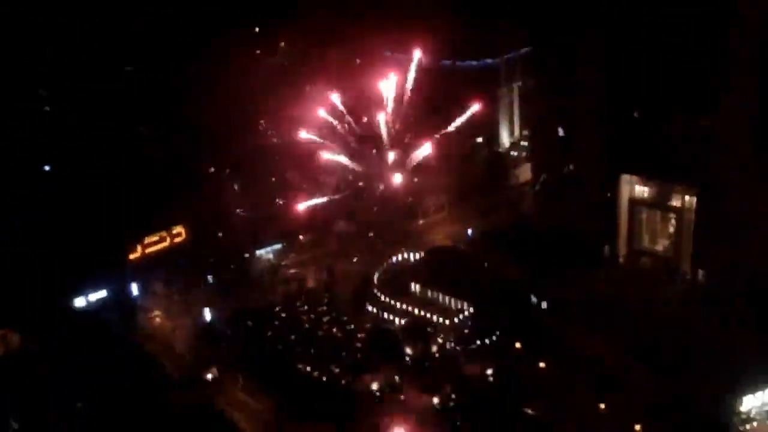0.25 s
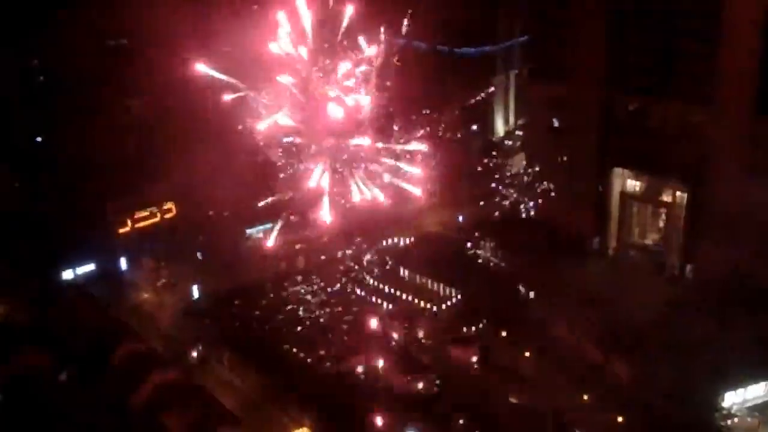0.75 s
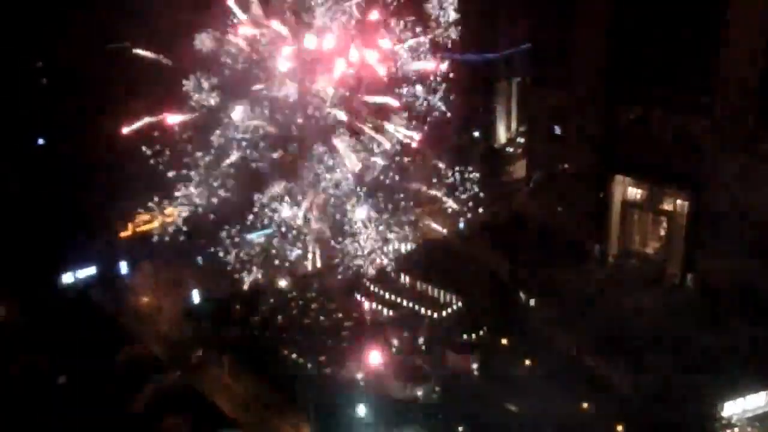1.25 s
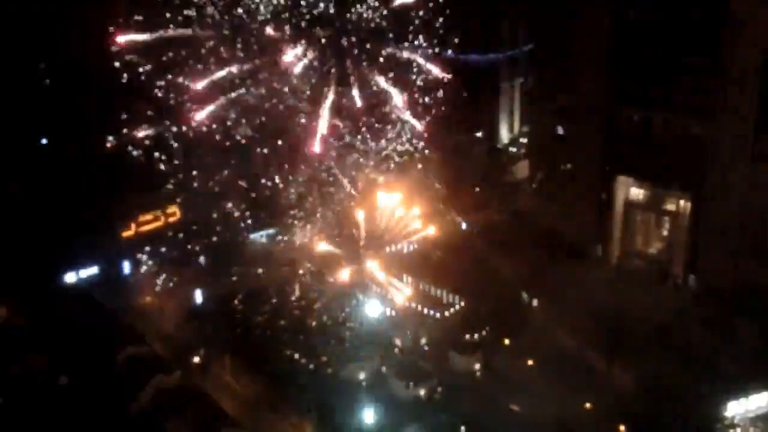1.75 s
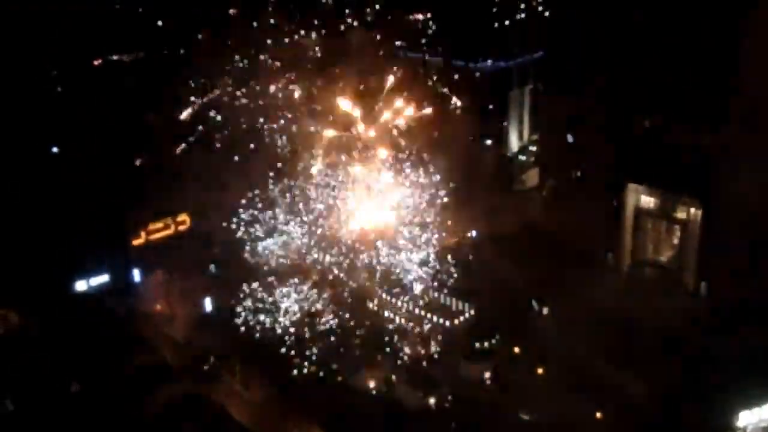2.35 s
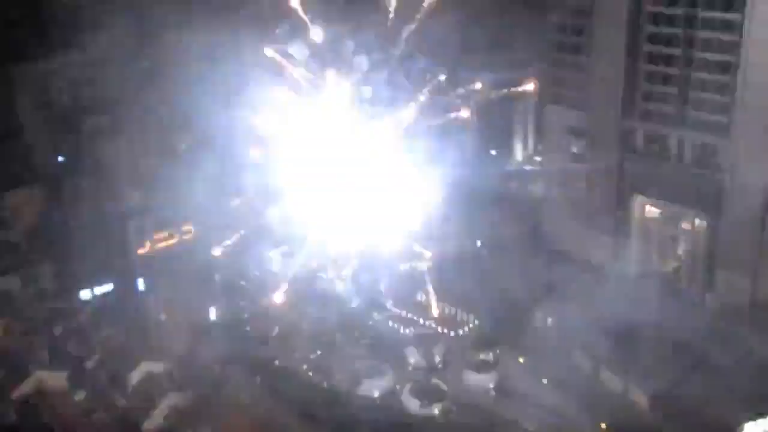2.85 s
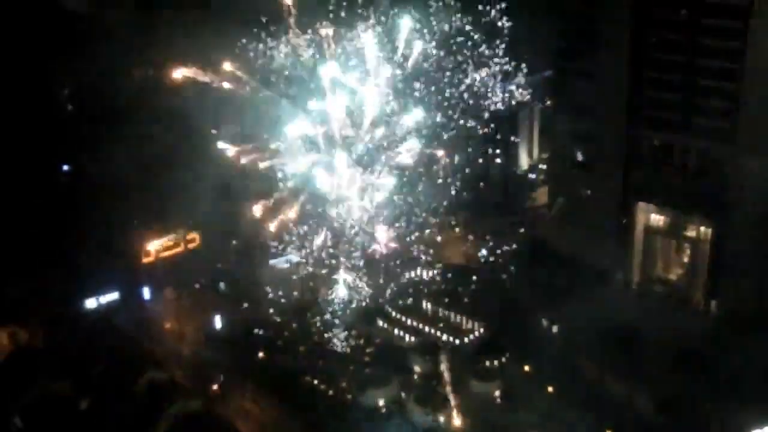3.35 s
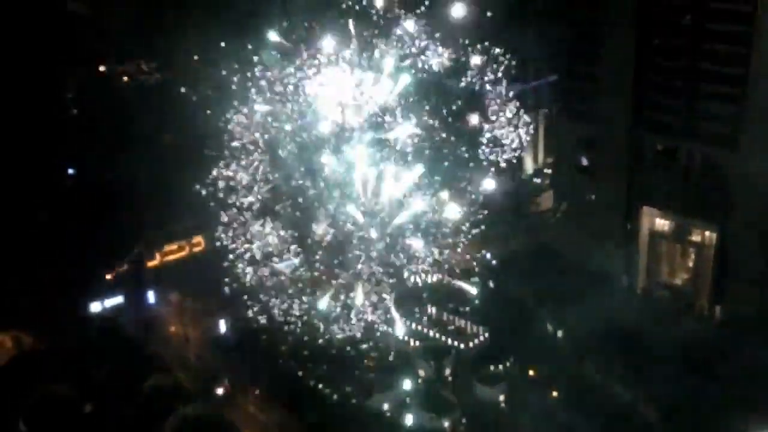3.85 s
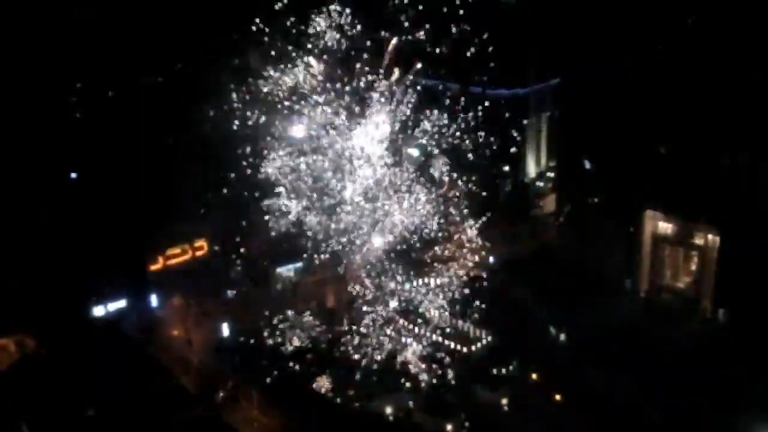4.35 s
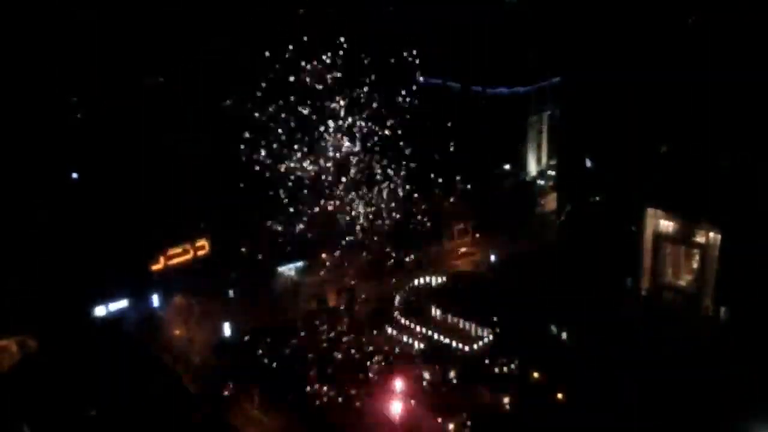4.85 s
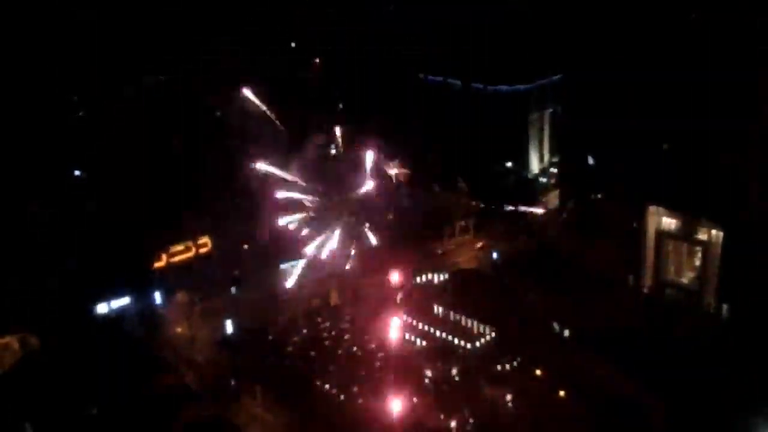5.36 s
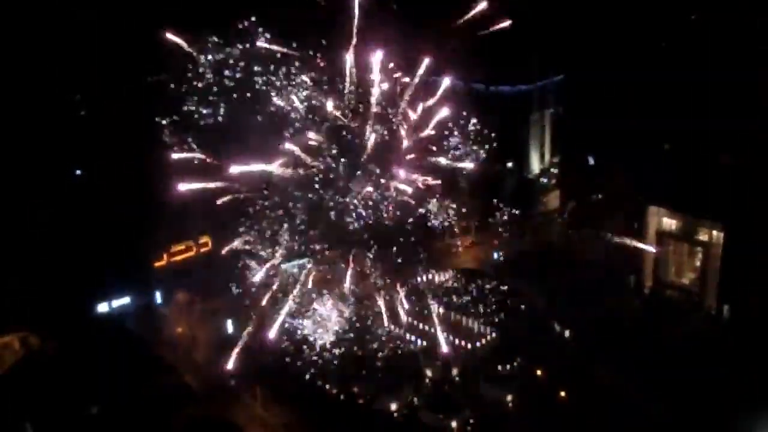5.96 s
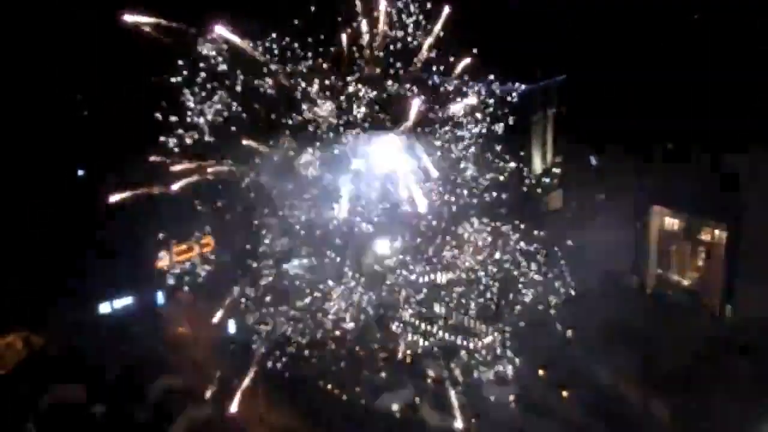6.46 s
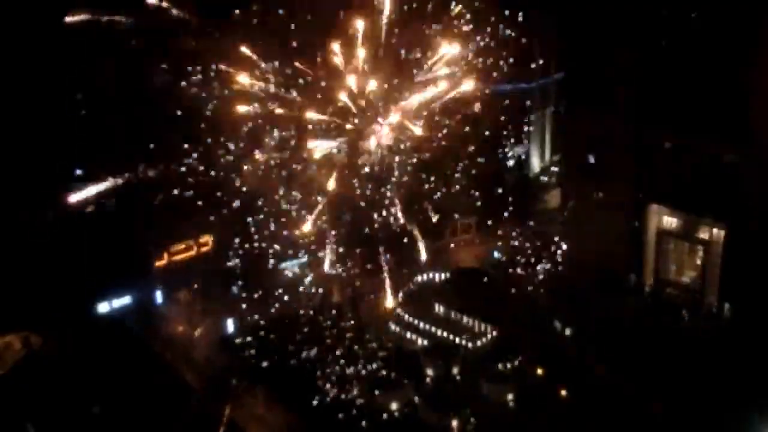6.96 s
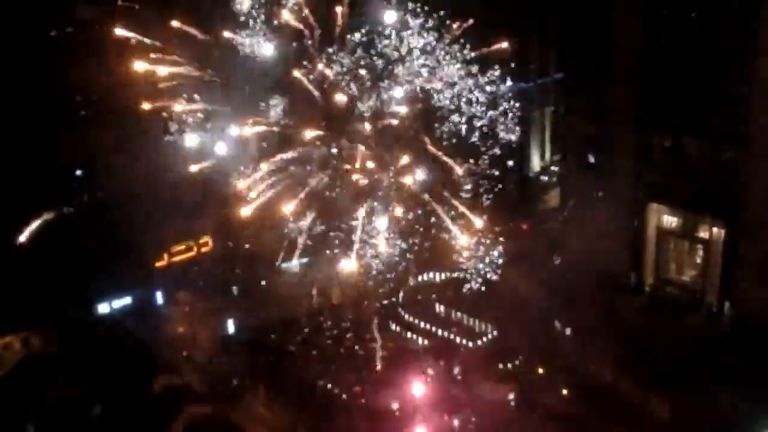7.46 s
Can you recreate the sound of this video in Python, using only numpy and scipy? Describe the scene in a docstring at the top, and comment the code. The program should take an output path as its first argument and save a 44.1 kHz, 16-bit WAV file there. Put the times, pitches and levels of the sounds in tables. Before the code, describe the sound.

Loud firework bangs and nonstop crackle across a city, with a rolling rumble underneath, heard from a room high above the street.

```python
"""A rolling din of fireworks, and almost at once the boom of a near shell, fill a room high above a street.
The night city's far reports, firecrackers and crackling stars superpose into that continuous din.
Launch tubes knock as their modes ring. Each near blast enters by the window as a pressure pulse,
slaps between the walls and excites the room's standing waves; the house fronts send it back.
The recorder turns its gain down after loud bangs."""
import sys
import numpy as np
from scipy import signal
from scipy.fft import rfft, irfft, next_fast_len
from scipy.io import wavfile
from scipy.ndimage import uniform_filter1d, minimum_filter1d

SR = 44100
rng = np.random.default_rng(int(sys.argv[2]) if len(sys.argv) > 2 else 0)


def inscribe(sig):
    """Save sig as 16-bit PCM at rate SR to the path in sys.argv[1].

    A 1-D sig is mono; a 2-D sig holds one channel per row.
    Samples are clipped to [-1, 1] before scaling.
    """
    pcm = np.round(np.clip(np.atleast_2d(sig).T, -1, 1) * 32767)
    wavfile.write(sys.argv[1], SR, pcm.astype(np.int16))


N = 339570
T = np.arange(SR // 2) / SR  # time axis of one bang, in seconds

# The far barrage of heavy shells. Each row: time in seconds, rumble level in dB, thud level in dB.
FAR_BARRAGE = [(0, -42, -31), (.5, -42, -33), (.8, -35, -26.5), (1.05, -34, -28), (1.28, -35.5, -29),
               (1.6, -45, -35), (1.85, -37, -34.5), (2.35, -41.5, -34.5), (2.9, -38, -32.5),
               (3.22, -37, -27.5), (3.6, -51, -31), (4.0, -38, -29), (4.4, -39.5, -33.5),
               (5.15, -42, -32.5), (5.5, -43, -29), (6.25, -43, -28.5), (6.65, -47, -33.5),
               (7.3, -34, -26.5)]
# Far strings of firecrackers. Each row: time in seconds, pop level in dB, crackle level in dB.
FAR_STRINGS = [(0, -32, -41.5), (.5, -32, -42.5), (1.25, -30, -41.5), (1.5, -34.5, -41.5),
               (2.0, -33.5, -41), (2.4, -35, -44), (2.68, -33.5, -40), (2.92, -35.5, -46), (3.25, -32, -41),
               (3.62, -34.5, -43.5), (3.95, -31.5, -40), (4.55, -34, -41.5), (4.85, -33, -41.5),
               (5.5, -33, -43.5), (6.0, -33.5, -43), (6.6, -37, -44), (7.3, -30.5, -40.5), (7.7, -30, -41)]
# Spectra of the din's five layers. Each row: frequency in Hz, relative spectral density in dB.
RUMBLE = [(20, -40), (31, -22), (41, 2.5), (52, -2), (65, -8), (86, 3.5), (110, -5.5), (160, -46)]
THUDS = [(70, -24), (115, -1), (165, 0.5), (200, -1), (250, -1.5), (320, -6), (430, -7), (650, -38.5)]
POPS = [(280, -42), (460, 0.5), (650, 0.5), (840, -1), (980, -3), (1150, -0.5), (1300, -6.5), (1550, -10),
        (2200, -70)]
CRACKLE = [(1000, -24), (1600, -1), (2100, 4.5), (2650, -4.5), (3050, -8.5), (4000, -18), (5000, -29),
           (7000, -39.5), (12000, -45.5)]
FIZZ = [(3000, -27), (5500, -14), (7500, 4), (10000, 4.5), (15500, 3)]
# Clouds of glitter stars. Each row: peak time in seconds, level in dB, Gaussian width in seconds.
GLITTER_CLOUDS = [(.4, -72.5, 0.061), (1.24, -71, 0.047), (1.675, -71, .1), (2.234, -66, 0.023),
                  (2.515, -63, 0.056), (3.886, -66, .06), (4.151, -69, 0.13), (4.533, -64, 0.03),
                  (4.637, -63, 0.04), (4.95, -72.5, .12), (6.206, -62, 0.034), (6.573, -65.5, 0.04),
                  (6.716, -65, 0.021), (7.392, -70, 0.051)]
# Their spectrum. Each row: frequency in Hz, relative spectral density in dB.
SPARKS = [(4000, 1), (5500, 4.5), (6400, 0), (7500, -3), (9500, -12), (13000, -17)]
# Clear firecrackers and stars. Each row: time in seconds, relative level in dB, centre frequency in Hz.
CRACKERS = [(0.2578, -27.5, 2010), (0.8384, -28, 2450), (1.1932, -31.5, 2550), (1.221, -24.5, 1920),
            (1.286, -27.5, 2010), (1.3477, -31.5, 2113), (1.3737, -22.5, 1966), (1.5368, -28, 2130),
            (4.7267, -32.5, 2370), (4.8871, -26, 2090), (5.019, -27, 2050), (5.149, -31, 1980),
            (5.8666, -30, 2250), (6.1993, -28, 2104), (7.2203, -27.5, 2087), (7.408, -28.5, 2110)]
STARS = [(1.054, -54, 4290), (1.915, -46.5, 4300), (2.235, -50, 4090), (3.887, -47, 4246),
         (4.732, -44.5, 4070), (4.886, -46, 3850), (5.814, -45, 3414), (7.53, -47, 4210)]
# Fainter, random ones. Each holds: number per second, typical relative level in dB, centre in Hz.
STRAY_CRACKERS = (2.5, -36.5, 2330)
STRAY_STARS = (5, -58, 4610)
# Clear distant reports. Each row: time in seconds, relative levels of thump, clap and ring in dB.
REPORTS = [(0.3, -46, -28.5, -32), (0.785, -24, -37, -34), (0.867, -27, -33.5, -41), (1.155, -35, -30, -38),
           (1.542, -23, -34, -29), (1.949, -30, -39, -33), (2.24, -28.5, -27.5, -38), (2.64, -23, -43, -38),
           (2.722, -20.5, -34.5, -37), (3.159, -29, -31.5, -48), (3.543, -31, -32.5, -27),
           (3.875, -36, -29.5, -39), (4.164, -33, -34, -34), (4.324, -43, -34, -27), (4.732, -38, -42, -27),
           (4.884, -41, -38, -30), (5.403, -42, -39, -30), (5.504, -20, -36, -50), (5.815, -35, -30, -26),
           (5.869, -23, -35, -33), (6.265, -23.5, -37, -31), (6.329, -29, -42, -32), (6.588, -34, -33, -34),
           (7.215, -21, -35, -26), (7.49, -22, -41, -31), (7.53, -38, -37, -25)]
# Fainter, random ones: number per second, typical relative levels of thump, clap and ring in dB.
STRAY_REPORTS = (4, -33, -40, -42)
# Spectra of a report's clap and ring. Each row: frequency in Hz, relative spectral density in dB.
REPORT_CLAP = [(330, -41), (480, -2), (850, -4), (1200, -10.5)]
REPORT_RING = [(800, -11), (1100, 9.5), (1450, -0.5), (2100, -33)]
# Knocks of launch tubes. Each row: start in seconds, relative level in dB.
LAUNCHES = [(0.5687, -12.5), (6.211, -20), (6.272, -25), (6.6507, -20.5)]
# Modes of a tube and of the room. Each row: frequency in Hz, relative level in dB, T60 in seconds.
TUBE_MODES = [(800, 3.5, 0.031), (1200, 4, 0.02), (1398, 2.5, 0.033), (2520, -19, .02), (4030, -29, 0.025)]
ROOM_MODES = [(41, -31.5, 0.76), (82, -34, 0.9), (205, -44, 0.37)]
# Near shells. Each row: start in seconds, relative levels of boom, clap, crack and sizzle in dB.
SHELLS = [(0.0778, -19.5, -24.5, -37.5, -56.5), (0.676, -17, -25, -34.5, -50),
          (0.7265, -20.5, -27, -32, -54.5), (0.8993, -21.5, -26, -33.5, -58),
          (1.022, -28.5, -28.5, -35, -62), (1.4, -18.5, -27.5, -35.5, -55),
          (1.764, -23, -26.5, -36.5, -51.5), (2.5286, -16, -23, -29.5, -47.5),
          (2.746, -18.5, -25, -32, -52), (2.949, -23.5, -30.5, -39.5, -56.4),
          (3.0297, -21.5, -27, -38, -54), (3.2409, -25, -22.5, -41, -54.0),
          (3.3366, -20, -25.5, -34, -52.7), (3.6853, -25.5, -27.5, -41.5, -55),
          (3.8273, -22.5, -27.5, -37, -57), (5.3102, -14, -23, -33.5, -45.5),
          (5.7031, -16, -23.5, -33, -47.5), (5.7548, -18, -24, -35, -51), (6.056, -21, -29.5, -38, -58),
          (6.14, -20, -27, -35, -52), (6.8457, -23, -28, -36.5, -55), (7.0247, -21, -26.5, -32.5, -52.5),
          (7.0895, -21, -27, -35.5, -57), (7.2978, -19.5, -25, -35.5, -53), (7.689, -19.5, -27, -34, -48.5)]
# Spectra of a blast coming through the window and of its three scattered parts.
# Each row: frequency in Hz, relative spectral density in dB.
BLAST = [(25, -57), (45, -3.5), (85, 3), (150, 6.5), (225, 4), (300, -5.5), (450, -12.5), (800, -13),
         (1200, -22.5), (1600, -51), (4000, -64), (9000, -65)]
CLAP = [(250, -29), (450, -1.5), (650, -6), (830, 0.5), (1000, -9), (1170, -4), (1450, -14), (2200, -21.5)]
CRACK = [(900, -22), (1500, -9), (2100, 4), (2600, 6.5), (3100, -2.5), (4000, -12.5), (5500, -29),
         (9000, -48)]
SIZZLE = [(2500, -6), (4800, 2.5), (7000, 1), (10000, -2.5), (12500, -1), (15500, -9)]
# Direct sound and first reflections off walls, floor and ceiling; the open window inverts one.
# Each row: delay in seconds, pressure gain.
ROOM_PATHS = [(0, 0.45), (.005, 0.18), (.0098, 0.81), (0.0115, -0.79), (0.0125, 0.75), (0.0178, 0.069),
              (.0232, 0.29), (.031, .18), (0.0547, 0.035)]
# Resonances of window and room. Each row: centre in Hz, bandwidth in Hz, gain in dB.
RESONANCES = [(193.5, 8.2, 6.5), (367.5, 22, 3), (842, 32, 3), (2120, 11, -1), (2556, 33, 8),
              (2660, 32, 5.5), (5330, 74, 6), (6200, 70, 8), (7700, 250, 3)]
# Stereo width. Each row: frequency in Hz, gain of side against mid in dB.
WIDTH = [(100, -34), (500, -27), (1000, -21), (2000, -14), (4000, -8.5), (8000, -8), (15000, -8)]
# Stereo balance. Each row: frequency in Hz, gain of left against right in dB.
BALANCE = [(200, 1.87), (600, 1.1), (2000, 1.8), (4000, 2.5), (8000, 3.5), (12000, 0)]

STRAY_SPREAD_DB, STRAY_SPREAD_OCTAVES = 2, 0.16  # standard deviations among the random bangs
ROLL_RISE_S, ROLL_T60_S = 0.11, 2  # the city's answer to a near shell swells and dies
ROLL_RUMBLE_DB, ROLL_THUDS_DB = -18, -13  # its two parts, against the shell's boom
FIZZ_UNDER_DB = -28  # against the crackle
DUCK_FROM_DB, DUCK_SHARE, DUCK_ATTACK_S, RECOVER_DB_PER_S = -19, 0.47, 0.05, 8
BASS_CUT_HZ, TOP_HZ = 34, 15830


def amp(db):
    """Amplitude ratio: a factor of ten for every 20 dB."""
    return 10 ** (np.asarray(db) / 20)


def unit(x):
    """Normalisation to rms 1."""
    return x / np.sqrt(np.mean(x ** 2) + 1e-20)


def unit_onset(x):
    """Normalisation of a bang to rms 1 over its first 25 ms."""
    return x / np.sqrt(np.mean(x[..., :SR // 40] ** 2))


def along(points, hz):
    """Interpolation of (Hz, value) points on a logarithmic frequency axis."""
    knots_hz, values = np.transpose(points)
    return np.interp(np.log(hz + 1), np.log(knots_hz + 1), values)


def curves(rows):
    """Linear interpolation in time: one value per sample for each column after the first."""
    times, *columns = np.transpose(rows)
    return [np.interp(np.arange(N) / SR, times, column) for column in columns]


def gain(points, hz):
    """Magnitude response of a spectrum, with a roll-off of 30 dB per octave beyond its ends."""
    octaves_below = np.maximum(np.log2(points[0][0] / (hz + 1)), 0)
    octaves_above = np.maximum(np.log2((hz + 1) / points[-1][0]), 0)
    return amp(along(points, hz) - 30 * (octaves_below + octaves_above))


def filtered(x, response):
    """Linear filtering: the spectrum of x is multiplied by a frequency response."""
    n = x.shape[-1]
    padded = next_fast_len(n + 8192)
    return irfft(rfft(x, padded) * response(np.fft.rfftfreq(padded, 1 / SR)), padded)[..., :n]


def coloured(x, points):
    """Zero-phase shaping of x by a tabulated spectrum."""
    return filtered(x, lambda hz: gain(points, hz))


def pulse(points, size=32768):
    """Minimum phase: folding the cepstrum gives a causal pressure pulse with this spectrum."""
    cepstrum = irfft(np.log(gain(points, np.fft.rfftfreq(size, 1 / SR)) + 1e-6))
    cepstrum[1:size // 2] *= 2
    cepstrum[size // 2 + 1:] = 0
    return irfft(np.exp(rfft(cepstrum)))[:len(T)]


def ringing(modes):
    """Free vibration: a sum of exponentially damped sinusoids."""
    return sum(amp(db - 60 * T / t60) * np.sin(2 * np.pi * hz * T) for hz, db, t60 in modes)


def noise():
    """Half a second of uncorrelated white noise for mid and side."""
    return rng.standard_normal((2, len(T)))


def burst(source, colour, rise, t60, tail_db, tail_t60=0.46, front=0):
    """Scattering in a room: after a bang's direct front, echoes build up and die, leaving a weak tail."""
    build = 1 - (1 - front) * np.exp(-(T / rise) ** 2)
    decay = amp(-60 * np.maximum(T - rise, 0) / t60) + amp(tail_db - 60 * T / tail_t60)
    return unit_onset(coloured(source, colour) * build * decay)


def add(track, s, x):
    """Superposition: x joins the track at s seconds."""
    start = int(np.clip(round(s * SR), 0, N - 1))
    track[:, start:start + len(T)] += x[:, :N - start]


def strays(rate, size):
    """Independent events: uniformly random times, each with `size` normal deviates."""
    moments, deviates = rng.uniform(0, N / SR, 64), rng.standard_normal((64, size))
    return [(s, *row) for s, row in zip(moments, deviates)][:int(rate * N / SR)]


def stray_charges(rate, db, hz):
    """Random charges, normally spread in level and log pitch, as rows of seconds, dB and Hz."""
    return [(s, db + STRAY_SPREAD_DB * loud, hz * 2 ** (STRAY_SPREAD_OCTAVES * high))
            for s, loud, high in strays(rate, size=2)]


def volley(colour, rate, spread_db, t60, wash_db, directions=6):
    """Shot noise: random far bangs, each convolved with its echoes, over their merged wash; rms 1."""
    bangs = np.zeros((2, N))
    for _ in range(directions):
        fired = rng.random(N) < rate / directions / SR
        sizes = amp(spread_db * np.clip(rng.standard_normal(N), -2, 1.5))
        echoes = noise() * amp(-60 * T / t60)
        bangs += signal.fftconvolve((fired * sizes)[None], echoes, axes=1)[:, :N]
    wash = amp(wash_db) * rng.standard_normal((2, N))
    return unit(coloured(unit(bangs) + wash, colour))


def city_roll():
    """Reverberation: the envelope of the city's echoes of the near shells, which add in energy."""
    t = np.arange(2 * SR) / SR
    answer = (1 - np.exp(-(t / ROLL_RISE_S) ** 2)) * amp(-60 * t / ROLL_T60_S)
    fired = np.zeros(N)
    for s, boom_db, *_ in SHELLS:
        fired[min(round(s * SR), N - 1)] = amp(boom_db)
    return np.sqrt(np.abs(signal.fftconvolve(fired ** 2, answer ** 2)[:N]))


def din():
    """Incoherent addition: far shells and echoes rumble and thud; small strings pop, crackle and fizz."""
    rumble_db, thuds_db = curves(FAR_BARRAGE)
    pops_db, crackle_db = curves(FAR_STRINGS)
    echoes = city_roll()
    rumble_gain = np.hypot(amp(rumble_db), amp(ROLL_RUMBLE_DB) * echoes)
    thuds_gain = np.hypot(amp(thuds_db), amp(ROLL_THUDS_DB) * echoes)
    fizz_gain = amp(crackle_db + FIZZ_UNDER_DB) * amp([[0], [-9]])  # weaker in the side channel
    out = rumble_gain * unit(coloured(rng.standard_normal((2, N)), RUMBLE))
    out += thuds_gain * volley(THUDS, rate=130, spread_db=3, t60=0.083, wash_db=0)
    out += amp(pops_db) * volley(POPS, rate=120, spread_db=4.5, t60=0.043, wash_db=4.5)
    out += amp(crackle_db) * volley(CRACKLE, rate=160, spread_db=7.5, t60=0.07, wash_db=5)
    return out + fizz_gain * volley(FIZZ, rate=270, spread_db=2, t60=0.018, wash_db=0)


def glitter():
    """Temporal fusion: stars going off almost together merge into short sizzling swells."""
    t = np.arange(N) / SR
    swell = sum(amp(db) * np.exp(-((t - s) / width) ** 2 / 2) for s, db, width in GLITTER_CLOUDS)
    return swell * volley(SPARKS, rate=170, spread_db=6, t60=0.022, wash_db=-10)


def crackers_and_stars():
    """Band-limited transients: firecrackers snap and stars tick, each pitched by its spectral peak."""
    out = np.zeros((2, N))
    for s, db, hz in CRACKERS + stray_charges(*STRAY_CRACKERS):
        colour = [(hz * 0.46, -18), (hz * 0.95, -4), (hz * 0.96, 0),
                  (hz * 1.09, -6), (hz * 1.72, -25), (hz * 3, -42)]
        snap = burst(noise(), colour, rise=0.002, t60=0.095, tail_db=-24, front=0.4)
        add(out, s - 0.001, amp(db - 10.5) * snap)
    for s, db, hz in STARS + stray_charges(*STRAY_STARS):
        colour = [(hz * 0.43, -10), (hz, 0), (hz * 1.26, -20)]
        tick = burst(noise(), colour, rise=0.0023, t60=0.063, tail_db=-22, front=0.44)
        add(out, s - 0.001, amp(db - 2.5) * tick)
    return out


def distant_reports():
    """Air absorption takes the treble from distant shells, leaving a thump, a clap and a ring."""
    out = np.zeros((2, N))
    rate, *typical_db = STRAY_REPORTS
    faint = [(s, *(np.array(typical_db) + STRAY_SPREAD_DB * np.array(deviates)))
             for s, *deviates in strays(rate, size=3)]
    for s, thump_db, clap_db, ring_db in REPORTS + faint:
        thump = burst(noise(), THUDS, rise=0.0047, t60=0.091, tail_db=-16)
        clap = burst(noise(), REPORT_CLAP, rise=0.0019, t60=0.17, tail_db=-24)
        ring = burst(noise(), REPORT_RING, rise=0.0053, t60=0.079, tail_db=-23)
        add(out, s, amp(thump_db - 3) * thump)
        add(out, s - 0.002, amp(clap_db) * clap + amp(ring_db - 8) * ring)
    return out


def launches():
    """Impulse excitation: a lifting charge ticks sharply and sets the modes of its tube ringing."""
    out = np.zeros((2, N))
    ring = ringing(TUBE_MODES) * (1 - np.exp(-(T / 0.0022) ** 2))
    for s, db in LAUNCHES:
        echo = burst(noise(), CLAP, rise=0.0064, t60=0.057, tail_db=-33)
        tick = burst(noise(), SIZZLE, rise=0.002, t60=0.04, tail_db=-26)
        add(out, s, amp(db) * (ring + amp(-17.5) * echo + amp(-52) * tick))
    return out


def near_shells():
    """Multipath propagation: all blasts take the same main paths in the room; the fine scatter varies."""
    out = np.zeros((2, N))
    slaps = lambda hz: sum(share * np.exp(-2j * np.pi * hz * delay) for delay, share in ROOM_PATHS)
    boom = unit_onset(filtered(pulse(BLAST), slaps)) + amp(17.5) * ringing(ROOM_MODES)
    common_scatter = noise()
    scatter = lambda: common_scatter / 2 + noise()
    for s, boom_db, clap_db, crack_db, sizzle_db in SHELLS:
        house_echoes = burst(noise(), THUDS, rise=0.029, t60=0.81, tail_db=-26)
        clap = burst(scatter(), CLAP, rise=0.0019, t60=0.092, tail_db=-32)
        back_wall_clap = burst(scatter(), CLAP, rise=0.002, t60=0.069, tail_db=-24)
        crack = burst(scatter(), CRACK, rise=0.0051, t60=0.08, tail_db=-29, front=0.27)
        # the harder the blast, the brighter its sizzle
        tilted = [(hz, db + 0.26 * (sizzle_db + 50) * np.log2(hz / 7000)) for hz, db in SIZZLE]
        sizzle = burst(scatter(), tilted, rise=0.002, t60=0.054, tail_db=-19, tail_t60=0.25, front=0.3)
        add(out, s, amp(boom_db) * (boom + amp(-30) * house_echoes))
        add(out, s, amp(clap_db - 3.5) * clap + amp(crack_db) * crack + amp(sizzle_db) * sizzle)
        add(out, s + 0.0098, amp(clap_db - 2.5) * back_wall_clap)
    return out


def scene():
    """Coherence: both microphones get like bass but unlike treble; the left is nearer the window."""
    resonance = lambda hz: amp(sum(db / (1 + (2 * (hz - centre) / width) ** 2)
                                   for centre, width, db in RESONANCES))
    near = near_shells() + launches()
    far = filtered(din() + glitter() + distant_reports() + crackers_and_stars(), resonance)
    mid, side = near + amp(-1) * far
    side = filtered(side, lambda hz: amp(along(WIDTH, hz)))
    left_right = np.array([mid + side, mid - side])
    return filtered(left_right, lambda hz: amp(np.outer([0.5, -0.5], along(BALANCE, hz))))


def ducked(x, size=882):
    """Automatic gain control: a loud bang turns the level down, and it creeps back."""
    power = uniform_filter1d(np.mean(x ** 2, axis=0), size)
    excess_db = np.maximum(10 * np.log10(np.abs(power) + 1e-12) - DUCK_FROM_DB, 0)
    recovery_db = RECOVER_DB_PER_S * np.arange(N) / SR
    cut_db = np.maximum.accumulate(DUCK_SHARE * excess_db + recovery_db) - recovery_db
    pole = np.exp(-1 / (DUCK_ATTACK_S * SR))
    return x * amp(-signal.lfilter([1 - pole], [1, -pole], cut_db))


def limited(x, ceiling_db, size=129):
    """Peak limiting: the gain dips for a few milliseconds around any peak above the ceiling."""
    needed = np.minimum(1, amp(ceiling_db) / (np.abs(x).max(axis=0) + 1e-9))
    return x * uniform_filter1d(minimum_filter1d(needed, size), size)


def record(dry):
    """Band limits and compression: the microphone drops deep bass; the recorder curbs peaks and treble."""
    bass_cut = lambda hz: (hz / BASS_CUT_HZ) ** 8 / (1 + (hz / BASS_CUT_HZ) ** 8)
    held = limited(ducked(filtered(dry, bass_cut)), ceiling_db=-5.5)
    return filtered(held, lambda hz: hz < TOP_HZ)


dry = scene()
out = record(dry)
inscribe(out)
```